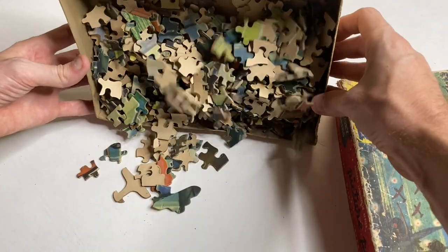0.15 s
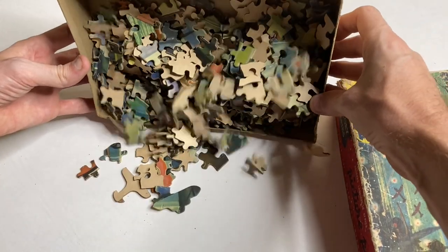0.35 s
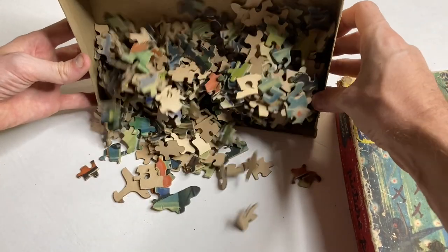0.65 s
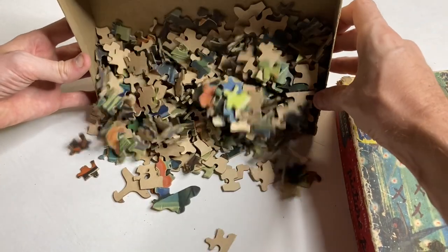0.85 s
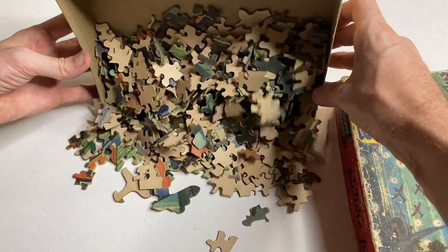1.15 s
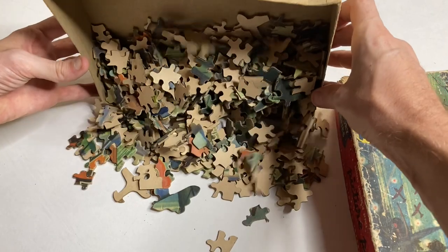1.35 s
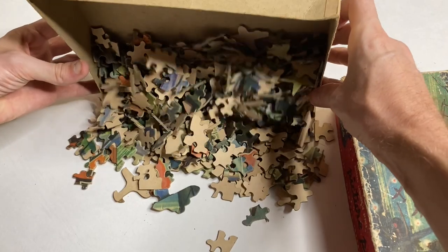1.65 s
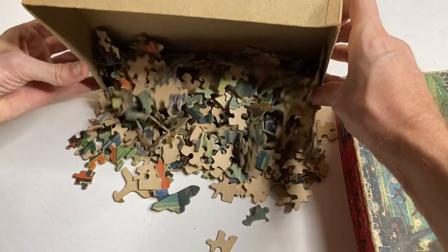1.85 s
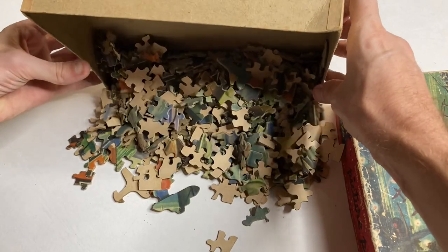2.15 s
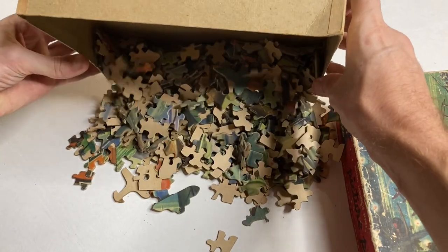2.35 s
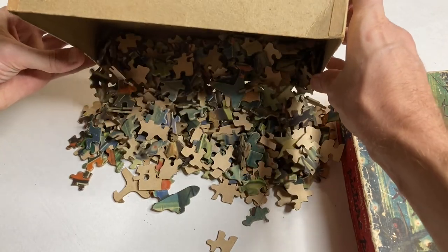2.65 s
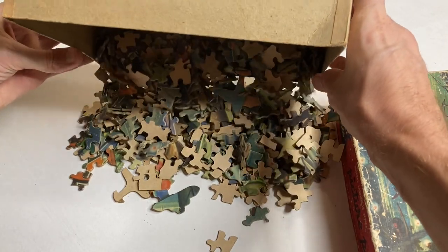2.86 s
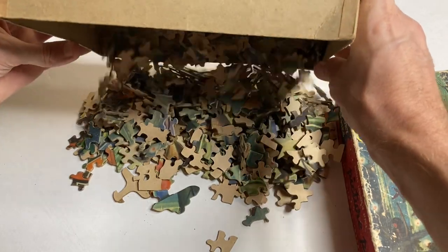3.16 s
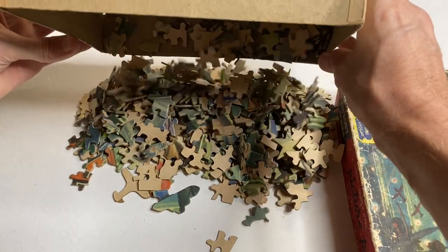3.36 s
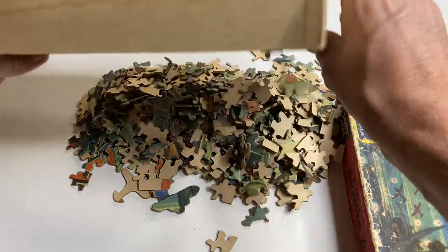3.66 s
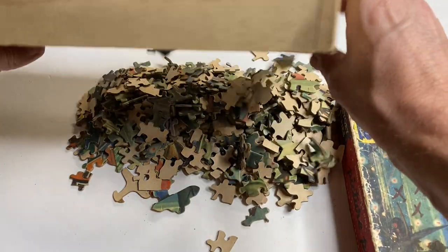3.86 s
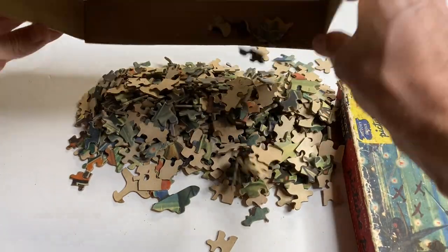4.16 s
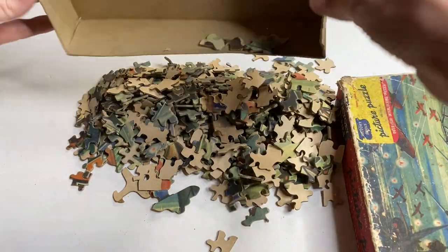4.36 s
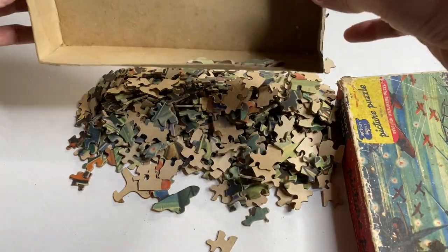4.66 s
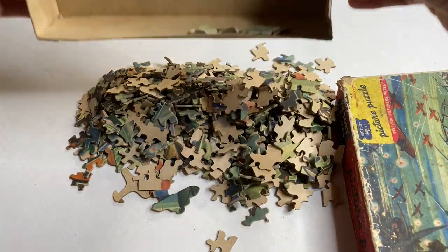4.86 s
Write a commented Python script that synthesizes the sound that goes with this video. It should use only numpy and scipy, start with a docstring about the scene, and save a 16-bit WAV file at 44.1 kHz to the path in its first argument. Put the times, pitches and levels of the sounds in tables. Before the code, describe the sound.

Cardboard jigsaw pieces pour from a box onto a table, a dense dry clatter thinning to sparse ticks, then box shakes and quiet.

```python
"""Cardboard jigsaw pieces clatter onto a table and the growing heap as they slide out of a tilted box, heard close up.
Each landing is a dry tick, mostly near 2 kHz: short rings with an edge snap, a dull thud and quick bounces.
Small contacts patter and scuff as clumped grains and patchy noise.
Pieces and fingers knock the hollow box, which rings in its wall modes and is shaken empty near the end.
A quiet room rumbles, hums and hisses underneath, made of coloured noise and one low tone."""
import sys
import numpy as np
from scipy import signal
from scipy.fft import rfft, irfft, next_fast_len
from scipy.io import wavfile
from scipy.ndimage import uniform_filter1d, map_coordinates

SR = 44100
rng = np.random.default_rng(int(sys.argv[2]) if len(sys.argv) > 2 else 0)


def invert_db(x):
    """Field ratio 10**(x/20) for x, a level in decibels (scalar or array-like)."""
    u = np.asarray(x, float) / 20
    return 10 ** u


def waveform_to_disk(signal):
    """Save audio, clipped to [-1, 1], as 16-bit WAV at the path in sys.argv[1]."""
    frames = np.transpose(np.atleast_2d(signal))
    scaled = np.clip(frames, -1, 1) * 32767
    samples = np.round(scaled).astype(np.int16)
    wavfile.write(sys.argv[1], SR, samples)


N = 220498  # length in samples

# How thick the stream of pieces is; each layer adds its own offset in dB:
# time_s [s], falling_db [dB], sliding_db [dB]
STREAM = [(0.0, -53, -77), (0.19, -56, -68), (0.42, -43.5, -67), (0.54, -37.5, -66), (0.85, -35, -68),
          (1.08, -41, -68.5), (1.21, -49.5, -78), (1.45, -67.5, -70), (1.63, -55.5, -69),
          (1.85, -48.5, -66), (1.99, -61, -73), (2.21, -58, -74.5), (2.34, -49.5, -70),
          (2.45, -55.5, -68.5), (2.77, -46, -76.5), (3.02, -51.5, -67.5), (3.15, -40.5, -65),
          (3.23, -42.5, -65), (3.44, -54.5, -70.5), (3.7, -53.5, -73), (3.84, -51, -73), (3.99, -56, -77.5),
          (4.41, -80.5, -86), (5.0, -83, -86)]


def unit(x):
    """Scales a sound to rms 1."""
    return x / np.sqrt(np.mean(x ** 2) + 1e-20)


def along(points, hz):
    """Reads (Hz, value) points on a log frequency axis."""
    f, v = np.transpose(points)
    return np.interp(np.log(hz + 1), np.log(f + 1), v)


def curves(rows):
    """Gives one value per sample for each column after the time."""
    s, *cols = np.transpose(rows)
    return [np.interp(np.arange(N) / SR, s, c) for c in cols]


def wobble(rate):
    """Draws a smooth random curve with `rate` knots a second."""
    knots = rng.standard_normal(int(N * rate / SR) + 4)
    return map_coordinates(knots, [np.arange(N) * rate / SR])


def humps(rows):
    """Adds bell-shaped swells from (s, dB, half length s) rows; each is down to 1/e at its half length."""
    t = np.arange(N) / SR
    return sum(invert_db(db) * np.exp(-((t - s) / half) ** 2) for s, db, half in rows)


def coloured(x, spectrum):
    """Filters x by a (Hz, dB) colour that closes down an octave outside its ends."""
    m = next_fast_len(N + 8192)
    hz = np.fft.rfftfreq(m, 1 / SR)
    closed = [(spectrum[0][0] / 2, -120), *spectrum, (spectrum[-1][0] * 2, -120)]
    return irfft(rfft(x, m) * invert_db(along(closed, hz)), m)[:N]


def noise(spectrum):
    """Makes coloured noise of rms 1."""
    return unit(coloured(rng.standard_normal(N), spectrum))


def patchy(x, depth_db):
    """Gives x random patches of gain in time and frequency, as many separate surfaces rub at once."""
    z = signal.stft(x, nperseg=256)[2]
    field = uniform_filter1d(rng.standard_normal(z.shape), size=10, axis=0)
    field = uniform_filter1d(field, size=8, axis=1)
    return unit(signal.istft(z * invert_db(depth_db * unit(field)), nperseg=256)[1][:N])


def blips(s, db, hz, turns, swell, size):
    """Adds short rings whose swell peaks at s after `turns` cycles; a higher `swell` makes a narrower peak."""
    rise = (turns / hz)[:, None]
    u = np.arange(size) / SR / rise  # time, 1 at the peak
    phase = rng.random((len(s), 1))
    wave = (u * np.exp(1 - u)) ** swell * np.sin(2 * np.pi * (turns * u + phase))
    at = np.round((s[:, None] - rise) * SR).astype(int) + np.arange(size)
    # samples outside the scene pile up at its ends; the last bin is cut off
    return np.bincount(np.clip(at, 0, N).ravel(), (invert_db(db)[:, None] * wave).ravel(), N + 1)[:N]


def spikes(s, db):
    """Places single impulses of the given levels."""
    return np.bincount(np.clip(np.round(s * SR).astype(int), 0, N - 1), invert_db(db), N)


def fading(x, t60):
    """Makes an envelope in which every impulse falls by 60 dB over t60 seconds."""
    return signal.lfilter([1], [1, -invert_db(-60 / (t60 * SR))], x)


def background():
    """Low room rumble with an unsteady mains hum, slow air movement stirred by the swinging box, and faint hiss."""
    # Colours of the air, the rumble and the hiss: pitch_hz [Hz], relative_level_db [dB per Hz]
    air_colour = [(4, -19), (8, 2), (20, 1), (27, -13), (40, -33.5)]
    rumble_colour = [(28, -8.5), (45, -6.5), (62, 0.5), (80, -1.5), (135, -5), (150, -21), (220, -40)]
    hiss_colour = [(88, -34), (150, 7), (400, -12.5), (433, -5.5), (459, -21), (780, -20), (913, -24.5),
                   (7610, -33), (16400, -43)]
    # The swinging box stirs the air: peak_s [s], level_db [dB], half_length_s [s]
    swings = [(3.45, -47.5, 0.094), (3.8, -36, 0.14), (4.1, -41.5, 0.1)]
    # The rumble swells briefly: peak_s [s], level_db [dB], half_length_s [s]
    swells = [(1.17, -45.5, 0.11), (1.6, -50.5, 0.32), (3.75, -58, 0.12), (4.35, -52.5, .15)]
    air_level = invert_db(-49.5 + 3.1 * wobble(2.1)) + humps(swings)
    air = air_level * noise(air_colour)
    rumble = np.hypot(invert_db(-54), humps(swells)) * noise(rumble_colour)
    hum_level = invert_db(-61 + 2.5 * wobble(3.9))
    hum = hum_level * np.sin(2 * np.pi * 119.5 * np.arange(N) / SR)
    hiss = invert_db(-69) * noise(hiss_colour)
    return air + rumble + hum + hiss


def rub():
    """Faint strokes as the empty box is lowered: dry friction, made as noise, excites two narrow resonances."""
    # The rubbing resonances: pitch_hz [Hz], width_hz [Hz], gain_db [dB, relative]
    resonances = [(1257, 99, -6.5), (1910, 33, 3)]
    # The rubbing strokes: peak_s [s], level_db [dB], half_length_s [s]
    strokes = [(4.29, -74, 0.059), (4.42, -69, .04), (4.63, -74, 0.044), (4.73, -73, 0.028),
               (4.85, -87, .06)]
    tones = 0
    for hz, width, db in resonances:
        resonator = signal.iirpeak(hz, hz / width, SR)
        tones = tones + invert_db(db) * signal.lfilter(*resonator, rng.standard_normal(N))
    return humps(strokes) * invert_db(1.1 * wobble(50)) * unit(tones)


def box_knocks():
    """A knock pushes one wall, then rings the wall modes, most those near its pitch."""
    # Knocks on the box walls: peak_s [s], push_db [dB], pitch_hz [Hz]
    knocks = [(0.118, -36, 520.0), (0.214, -28, 550), (0.324, -30.5, 604), (0.456, -35, 600.0),
              (0.5, -26, 617), (0.506, -38, 780), (0.539, -29, 590), (0.558, -34, 484), (0.684, -32.5, 484),
              (0.73, -32, 637), (0.806, -36, 800.0), (0.812, -36, 600.0), (0.929, -38, 630.0),
              (1.177, -34, 517), (1.401, -37.5, 625), (1.632, -40.5, 347), (2.099, -25.5, 460.0),
              (2.122, -44, 506), (2.138, -40, 490.0), (2.36, -37.0, 620), (2.527, -40.5, 360),
              (3.101, -37.0, 410.0), (3.124, -43, 390.0), (3.283, -39.5, 390.0), (3.44, -39.0, 520),
              (3.629, -34, 504), (3.65, -25, 330), (3.665, -37, 304), (3.71, -33, 460.0),
              (3.742, -30.5, 440.0), (3.77, -34, 374), (3.786, -28, 505), (3.8, -33, 460.0),
              (3.862, -37, 380.0), (3.925, -34, 295), (3.929, -33.0, 750), (3.941, -34.5, 750),
              (3.958, -31, 330.0), (3.962, -34.5, 750), (3.975, -40, 360.0), (4.019, -39, 460.0),
              (4.04, -35, 480)]
    # Wall modes of the box: pitch_hz [Hz], level_db [dB over the push, before losses], t60_s [s]
    wall_modes = [(274, -9.5, 0.18), (374.6, -8.5, 0.13), (460, -3.5, 0.04), (520, -15.5, 0.04),
                  (660, -4, 0.062), (829, 1.5, 0.05)]
    off_pitch_db = 24  # lost for each octave between a mode and the struck wall's pitch
    s, db, hz = np.transpose(knocks)
    push = blips(s, db, hz, turns=0.72, swell=1.0, size=1500)
    octaves_away = np.abs(np.log2(np.transpose(wall_modes)[0] / hz[:, None]))
    strengths_db = rng.normal(0, 2.2, octaves_away.shape) - off_pitch_db * octaves_away
    t = np.arange(SR // 4) / SR
    rings = 0
    for (mode_hz, level, t60), strength_db in zip(wall_modes, strengths_db.T):
        onset = 1 - np.exp(-t / 0.0012)
        ring = invert_db(-60 * t / t60) * np.sin(2 * np.pi * mode_hz * t) * onset
        hits = spikes(s - .002, db + level + strength_db)
        rings = rings + signal.fftconvolve(hits, ring)[:N]
    return push + rings


def box_drumming():
    """The stream of pieces and the emptying shakes drum on the hollow box: uneven noise in the box's colour."""
    # Colour of the drumming: pitch_hz [Hz], relative_level_db [dB per Hz]
    box_colour = [(130, -15), (200, -9.5), (300, -2.5), (500, -3.5), (800, -11), (1200, -9.5),
                  (2000, -35.5)]
    # Shakes that empty the box: start_s [s], peak_drumming_db [dB]
    shakes = [(3.629, -41.5), (3.761, -37.5), (3.918, -41)]
    shake_s = 0.023  # from the start of a shake to its peak
    shaken = 0
    for start, db in shakes:
        u = np.maximum(np.arange(N) / SR - start, 0) / shake_s
        shaken = shaken + invert_db(db) * u * np.exp(1 - u)
    falling_db, sliding_db = curves(STREAM)
    drive = invert_db(falling_db - 12.5) + invert_db(sliding_db + 10) + shaken
    return drive * unit(invert_db(3.05 * wobble(40)) * noise(box_colour))


def patter(count=5000):
    """Countless small contacts in the sliding heap come in clumps, a few much larger; edges tick, faces scuff."""
    # Colour of the scuffing: pitch_hz [Hz], relative_level_db [dB per Hz]
    scuff_colour = [(2500, -2.5), (4000, 1), (6000, -10.5), (9000, -4), (15000, -9), (16400, -14.5)]
    s = np.sort(rng.random(count)) * N / SR
    grain_tune, tick_tune = rng.standard_normal((2, count))
    grain_size, tick_size = np.minimum(rng.exponential(size=(2, count)), 4)
    grain_hz = 1900 * np.exp(0.25 * grain_tune)
    grains = blips(s, 3.7 * grain_size, grain_hz, turns=1.3, swell=0.55, size=300)
    clumped = invert_db(1.3 * wobble(60)) * grains
    tick_hz = np.clip(5500 * np.exp(0.66 * tick_tune), 2500, 14000)
    ticks = blips(s, 6 * tick_size, tick_hz, turns=1.8, swell=1.4, size=200)
    scuff = patchy(noise(scuff_colour), depth_db=2.0) + invert_db(-3) * unit(ticks)
    falling_db, sliding_db = curves(STREAM)
    return invert_db(falling_db - 7) * unit(clumped) + invert_db(sliding_db + 3.5) * unit(scuff)


def lesser_landings(count=600):
    """Rows like the clearest landings, at random moments, stronger where the falling stream is thicker."""
    s = rng.random(count) * N / SR
    size, tune, upper, snap = np.clip(rng.standard_normal((4, count)), -2, 2)
    db = np.interp(s, *np.transpose(STREAM)[:2]) + 8.5 + 4.5 * size
    hz = 1900 * np.exp(.13 * tune)
    upper_db = -24 + 6 * upper  # over the landing's peak, as is the snap
    snap_db = -29.5 + 5 * snap
    return np.c_[s, db, hz, upper_db, snap_db]


def landings(bounces=4):
    """A piece touches a corner down, thuds, rings in two modes, snaps at its edge and rattles flat in weaker bounces."""
    # The clearest pieces landing: peak_s [s], peak_db [dB], pitch_hz [Hz],
    # upper_mode_db [dB over the peak], edge_snap_db [dB over the peak]
    clearest = [(0.0257, -24, 1740, -9, -37), (0.0279, -19.5, 2060, -21, -29.5),
                (0.0644, -34.0, 1980.0, -20, -18), (0.0837, -31.5, 1830, -29, -33),
                (0.1185, -26.5, 1570.0, -30, -44), (0.1399, -33, 1700, -31, -38.0),
                (0.1979, -26, 1910.0, -27.5, -28.5), (0.2027, -11, 1910, -32, -39),
                (0.2074, -11.0, 1800, -38, -24), (0.2122, -9.5, 2180, -21, -25.5),
                (0.2955, -30, 1800, -22.0, -31.0), (0.3004, -9.5, 1880, -24, -37),
                (0.3023, -23.5, 1750, -16.5, -31.0), (0.3158, -13, 1690.0, -22, -40),
                (0.3243, -20.5, 1960, -22.0, -30), (0.3454, -27, 1540, -16, -37.0),
                (0.3544, -24, 2000.0, -24, -27), (0.3646, -22.0, 2030, -22, -29.0),
                (0.3748, -26, 1690.0, -29.0, -39.5), (0.382, -13.5, 1850, -15, -38),
                (0.4138, -22, 1900, -17, -32), (0.4201, -16.5, 1800, -25.0, -42),
                (0.4284, -27, 1880.0, -28.5, -37), (0.4416, -43, 1900, -31.0, -38),
                (0.4554, -13, 2050, -21.5, -35), (0.4618, -20, 2020, -18.0, -22),
                (0.4806, -28, 1880.0, -22, -11), (0.4993, -11.5, 1810, -12, -28.0),
                (0.5019, -29, 1640, -20.5, -31.5), (0.5089, 1, 2054, -25, -33.5),
                (0.515, -27, 1810.0, -27, -32.0), (0.5246, -30, 1820, -23.5, -32.0),
                (0.5283, -29, 1970, -25, -34), (0.5315, -23, 1650, -21.0, -38),
                (0.5401, -18, 1440, -20, -32), (0.5485, -22, 2020.0, -25.0, -40),
                (0.552, -17.0, 2150.0, -27, -43), (0.5561, -25, 2040.0, -27.0, -36),
                (0.5695, -27, 1680.0, -19, -35.0), (0.6015, -24, 1660.0, -18, -30.0),
                (0.6164, -18.0, 2050, -31, -38), (0.6449, -16, 1760, -33, -39),
                (0.6742, -21, 1770, -30.0, -29.5), (0.6783, -13.5, 1860.0, -14, -33),
                (0.6814, -13.5, 2070, -10, -38), (0.6838, -15, 1910.0, -15, -31.5),
                (0.6862, -23, 1920, -21.5, -27), (0.7074, -24, 1950.0, -33.0, -32.0),
                (0.7307, -18, 2240, -8, -27.0), (0.7348, -12.5, 1820, -21.0, -34),
                (0.7398, -17.5, 2020.0, -24, -30), (0.7448, -25, 1760, -29, -35),
                (0.7608, -12.5, 2300, -12.5, -35), (0.7632, -12.5, 1690.0, -31, -41),
                (0.7746, -20, 1970, -18, -36), (0.7769, -23, 2000, -10, -24),
                (0.7981, -20.0, 1780, -26.0, -41), (0.8121, -15.5, 2100.0, -17, -27.0),
                (0.8179, -28, 2060, -19.0, -37.5), (0.8262, -8.5, 1910.0, -22, -32.0),
                (0.8435, -9.5, 1860, -23, -33), (0.8477, -19.0, 1900.0, -24.0, -33),
                (0.8498, -17, 1940, -12, -25), (0.8527, -21.0, 2640.0, -6, -24),
                (0.862, -35, 1960.0, -27.0, -28.5), (0.8763, -11.5, 2080, -18, -31),
                (0.8972, -13, 1980, -15, -26.0), (0.9087, -10, 2190, -11.5, -25.5),
                (0.9205, -21, 1980, -20.5, -20), (0.9238, -14, 2310, -13, -30),
                (0.9302, -7.5, 2020, -8.5, -23.5), (0.9394, -17.5, 1950, -21.0, -24),
                (0.9438, -22.0, 1900, -18.0, -33), (0.9496, -20, 1850, -18.0, -28),
                (0.9551, -20, 1900, -7, -37), (0.9633, -21, 1640, -20.0, -23),
                (0.9683, -24, 1530, -25, -25), (0.9714, -19.5, 1890.0, -12, -30.0),
                (0.9903, -27, 1830.0, -34, -39), (0.9995, -21.5, 1980, -7, -26),
                (1.0094, -25, 1830.0, -24, -22), (1.0141, -21.5, 1790, -27, -28.0),
                (1.0179, -25, 1960, -24.0, -29.0), (1.0825, -22, 1850, -29, -37),
                (1.1061, -32, 2130, -26, -38), (1.1307, -27.0, 2120, -22.0, -40),
                (1.1531, -16, 2080, -31, -27.5), (1.1868, -25.5, 1760, -19.0, -26),
                (1.1931, -30, 1580.0, -26.0, -35.0), (1.1958, -29, 2060, -22, -28),
                (1.204, -25, 1950.0, -28, -28), (1.2135, -25, 2170, -27, -31),
                (1.223, -27.5, 1820, -25, -25), (1.2481, -32.5, 1710.0, -31, -25.0),
                (1.3996, -25.5, 2200, -16, -22.5), (1.46, -30.0, 2050, -11, -19),
                (1.4657, -31, 2060, -23.0, -25.0), (1.4844, -33.5, 2220.0, -19.0, -30),
                (1.4966, -33, 1990.0, -13, -20), (1.5189, -34, 2030.0, -25, -27.0),
                (1.6134, -25, 2170, -15, -32), (1.6249, -23.5, 1660.0, -10, -35),
                (1.7362, -36.0, 1620.0, -30.0, -17), (1.7663, -29, 2140.0, -8, -18),
                (1.7695, -23.5, 2140, -24, -31), (1.8329, -28, 1900.0, -24, -31),
                (1.8556, -32.5, 1790, -11, -35), (1.9944, -45.5, 3030.0, -16.0, -7),
                (2.1602, -30.5, 1970.0, -18.0, -33.0), (2.1622, -27, 2060, -26, -34),
                (2.2107, -36.5, 2310.0, -26, -30.0), (2.2269, -33.5, 2380.0, -17, -25.0),
                (2.2394, -34.0, 1760, -20, -30.0), (2.2602, -32.5, 1940, -24, -31),
                (2.2864, -26.5, 2500, -29, -35), (2.302, -23.5, 1790, -9, -31.0),
                (2.306, -33, 2300, -12, -33), (2.3136, -30, 1860, -19, -32),
                (2.3179, -29.0, 1540, -22.0, -34), (2.3522, -23, 2350, -13, -34),
                (2.3541, -27.5, 1740.0, -20, -33), (2.3922, -27, 1930.0, -16, -32),
                (2.4068, -21, 2000, -19, -32), (2.409, -27, 2070.0, -29.0, -30.0),
                (2.419, -33, 2080, -27, -30.0), (2.4293, -29.0, 2040.0, -20.0, -29.0),
                (2.4417, -25, 1920.0, -29, -26), (2.4685, -35.0, 1910.0, -27.0, -29.0),
                (2.4893, -21, 1860, -26, -27), (2.4961, -28, 2430, -13.0, -27),
                (2.5, -25.0, 2480.0, -19, -24), (2.503, -21.5, 1820, -12.5, -25.5),
                (2.528, -26.5, 2020, -22.0, -29), (2.582, -19, 2080, -25, -31),
                (2.584, -22.5, 1900.0, -18, -32), (2.5897, -25, 2000, -16.0, -30),
                (2.5936, -25, 1700, -18, -35), (2.5979, -17.5, 1860, -11, -27.5),
                (2.6065, -28, 2300, -17, -21), (2.6105, -26, 2120, -12.5, -27),
                (2.625, -26, 2070.0, -16.0, -28), (2.6321, -18.5, 2000, -21.0, -35.0),
                (2.6376, -32, 1710.0, -27.0, -37.0), (2.7105, -33, 2560, -5, -20.0),
                (2.7191, -21, 2480, -7.5, -34), (2.7241, -29, 2540, -0.5, -35),
                (2.7821, -29, 2140, -10.0, -32), (2.7927, -22, 2790, -7.0, -32),
                (2.7951, -27, 2850.0, -22, -36), (2.7998, -28.5, 2640.0, -3, -22),
                (2.8344, -27.5, 2480, -6, -21), (2.9434, -30, 2140.0, -27, -30),
                (2.9533, -19.5, 2330, -23, -39), (2.9811, -34, 1880.0, -23.0, -28),
                (3.02, -32, 2160, -19.0, -30.0), (3.0309, -25, 2160.0, -18.0, -25),
                (3.0328, -16, 2020, -28, -34), (3.0357, -20, 2340, -23, -39), (3.0649, -24, 1900, -16, -30),
                (3.0734, -27.0, 1780, -14, -27), (3.101, -26.5, 1840, -18, -27.0),
                (3.16, -28, 2650, -9, -23), (3.1957, -30, 2650, -14, -31), (3.1991, -24, 2170, -3, -31.0),
                (3.2015, -26, 2240, -19, -33.0), (3.2039, -26, 1880, -21.0, -32),
                (3.2087, -27, 2050, -10, -27), (3.2156, -27.5, 2280, 2, -31), (3.2251, -22, 2030, -15, -29),
                (3.23, -30, 3120.0, 2, -27), (3.2479, -29, 1960, -10, -30), (3.2761, -21, 2020.0, -24, -40),
                (3.2802, -25, 2030, -7, -13.5), (3.311, -33.5, 2660, -6, -19),
                (3.4104, -33, 2000.0, -16.0, -12.5), (3.4584, -35.0, 1930, -7, -31),
                (3.544, -29.0, 1500, -13, -19.5), (3.6225, -27, 1980.0, -10, -34),
                (3.6266, -35, 2070, -14.0, -35), (3.6358, -17, 2040, -33, -21),
                (3.6395, -21, 1600, -16, -21.5), (3.6427, -20.5, 2090.0, -12, -23.0),
                (3.6445, -17.5, 2110, -20, -26), (3.6492, -16, 1550, -15, -33),
                (3.652, -20.5, 1570.0, -21, -35), (3.6548, -36, 1680, -23.0, -31.0),
                (3.6584, -26.5, 1560, -16, -35), (3.6624, -20.5, 1540, -17, -37),
                (3.6681, -26, 1670, -25.0, -30), (3.7064, -26, 1550, -15, -19.5),
                (3.7369, -25.5, 1810, -6.5, -42), (3.7444, -25, 1650, -32, -35),
                (3.7782, -20, 1650.0, -32, -26.0), (3.7814, -21, 2070, -22.0, -35),
                (3.7844, -17.5, 1910.0, -8, -34), (3.7864, -17.5, 2030, -29, -32.0),
                (3.7902, -18.5, 1540, -16, -36), (3.7923, -21, 1550, -31, -35.5),
                (3.7947, -18.5, 1900, -24, -23), (3.7985, -19, 1490, -16, -20),
                (3.8041, -22, 1770, -28, -25), (3.8063, -32, 1500, -18, -23),
                (3.8497, -39, 1930.0, -13, -31.0), (3.9301, -22, 2100, -13.0, -32),
                (3.9322, -29.0, 1800, -10, -39.0), (3.9357, -28, 2070, -21, -22.0),
                (3.9389, -13, 1790.0, -34, -25.5), (3.9429, -17.5, 1800.0, -12.5, -31.0),
                (3.9467, -30.0, 1610, -22, -30), (3.9558, -20.5, 1620, -5, -23.5),
                (3.9593, -28.5, 2100, -18, -22.0), (3.9612, -29.0, 1630.0, -19, -18),
                (3.9662, -31, 1780.0, -29, -25), (4.0141, -28.5, 1950, -30, -27),
                (4.0379, -34.5, 1400.0, -31.0, -43), (4.0518, -27.0, 2030, -32, -32),
                (4.1305, -42, 1960, -36.0, -39.0), (4.1329, -21.5, 2100, -21.5, -33),
                (4.1831, -33.0, 1840, -20.0, -30), (4.2012, -42.5, 4060, -13, -22),
                (4.2206, -40, 2060, -30, -33), (4.2456, -50.5, 1610, -1, -5),
                (4.3117, -43.5, 1600, -15.5, -17), (4.3534, -55, 1520.0, -8, -21.5),
                (4.6054, -62, 1930, -13.0, -5), (4.6119, -58, 1880.0, -17, -6)]
    # Colour of the edge snap: pitch_hz [Hz], relative_level_db [dB per Hz]
    snap_colour = [(2500, -24), (4000, 7), (6000, -9.5), (7500, -6.5), (15000, -7), (16400, -20.5)]
    s, db, hz, upper_db, snap_db = np.r_[clearest, lesser_landings()].T
    count = len(s)

    # the face lands: lower ring, upper ring and a burst of noise from the edge
    ring = blips(s, db, hz, turns=1.5, swell=4.03, size=400)
    upper_hz = 2900 + 1100 * rng.random(count)
    upper = blips(s, db + upper_db, upper_hz, turns=2.0, swell=2.0, size=200)
    snap = fading(spikes(s - .0004, db + snap_db), 0.0073) * noise(snap_colour)

    # a corner touches down just before the face, by 1.2 to 4.2 ms
    early = s - .003 * (0.392 + rng.random(count))
    corner = blips(early, db - 18.5, hz, turns=1.6, swell=1.4, size=300)
    corner_snap = fading(spikes(early, db + snap_db - 5.5), 0.01) * noise(snap_colour)

    # the surface under the piece gives a short dull thud
    thud_hz = 750 * np.exp(0.33 * rng.standard_normal(count).clip(-2, 2))
    thud = blips(s, db - 25, thud_hz, turns=.8, swell=1.2, size=400)

    # the later a bounce, the weaker
    late, tune, loss = rng.random((3, count, bounces))
    late = 0.000983 + 0.011 * late ** 1.8  # seconds after the landing
    bounce_s = s[:, None] + late
    bounce_db = db[:, None] - 3.0 - 1300 * late - 8 * loss
    bounce_hz = hz[:, None] * np.exp(0.47 * (tune - .5))
    rattle = blips(bounce_s.ravel(), bounce_db.ravel(), bounce_hz.ravel(), turns=1.5, swell=2.6, size=300)
    return corner + corner_snap + thud + ring + upper + snap + rattle


def room(x):
    """Reverberation: a noise tail, 200 samples late, in which each frequency dies at its own speed."""
    # The room's decay: pitch_hz [Hz], t60_s [s]
    decay = [(300, 0.83), (2000, 0.25), (10000, 0.38)]
    hz, t, z = signal.stft(rng.standard_normal(SR // 2), SR, nperseg=256)
    dying = invert_db(-60 * t / along(decay, hz)[:, None])
    tail = signal.istft(z * dying, SR, nperseg=256)[1]
    return signal.fftconvolve(np.pad(x, (200, 0)), tail / np.linalg.norm(tail))[:N]


def scene():
    """Adds the near sources, their room and the background, as one channel."""
    near = landings() + patter() + box_knocks() + box_drumming() + rub()
    return (near + invert_db(-13.5) * room(near) + background())[None]


def top_cut(x):
    """A steep low-pass: nothing is heard above 16.5 kHz."""
    return signal.sosfilt(signal.butter(12, 16510, fs=SR, output="sos"), x)


def record(dry):
    """The input flattens the loudest peaks, then a steep filter weakens what lies above its band limit."""
    top, hard = .53, 6  # highest amplitude, and how sharply the input bends toward it
    clipped = dry / (1 + np.abs(dry / top) ** hard) ** (1 / hard)
    band_limit = signal.ellip(8, .3, 30, 15600, fs=SR, output="sos")  # ripple dB, loss dB, limit Hz
    kept = signal.sosfilt(band_limit, clipped)
    return top_cut(kept)


dry = scene()
out = record(dry)
waveform_to_disk(out)
```